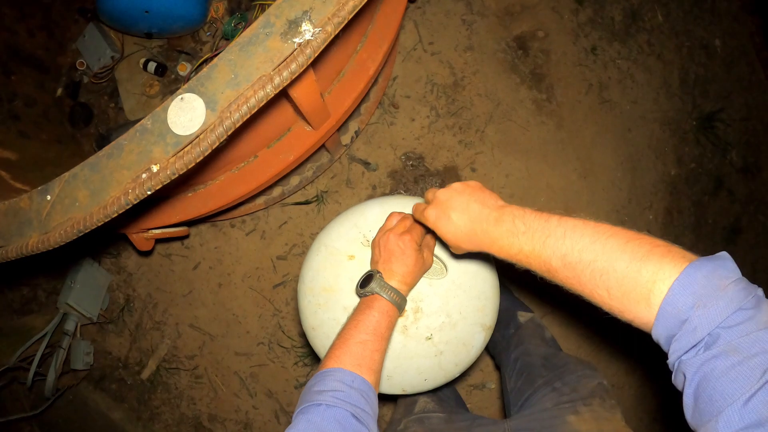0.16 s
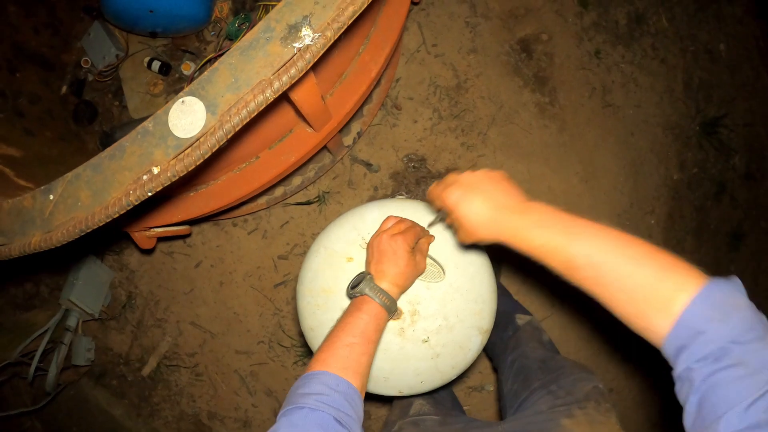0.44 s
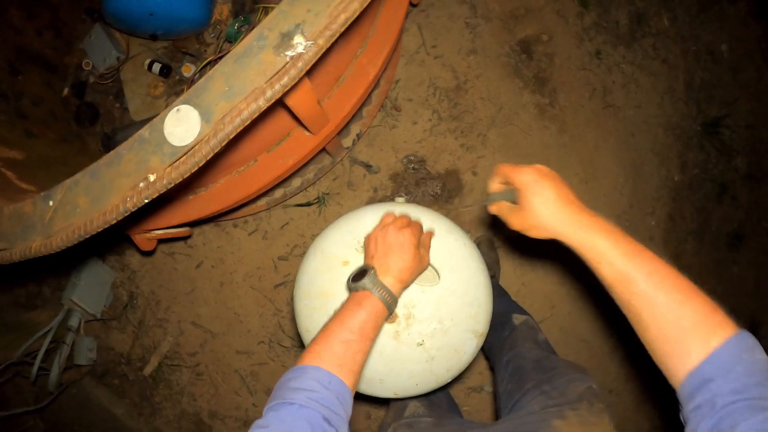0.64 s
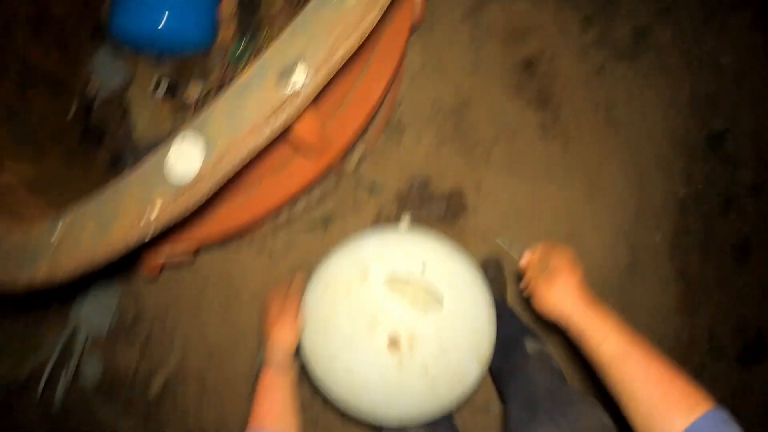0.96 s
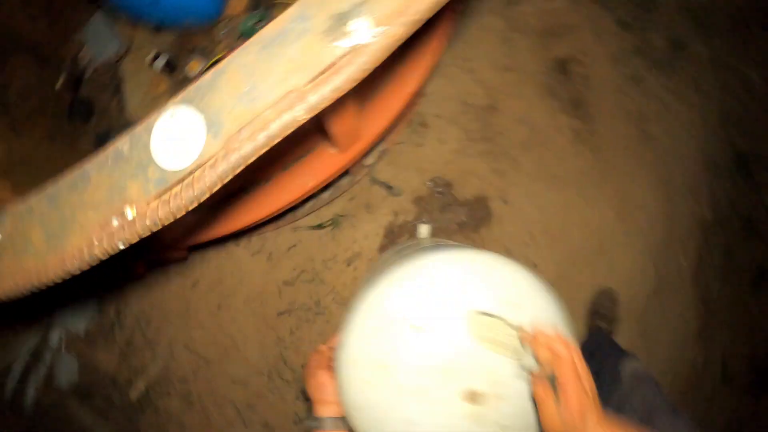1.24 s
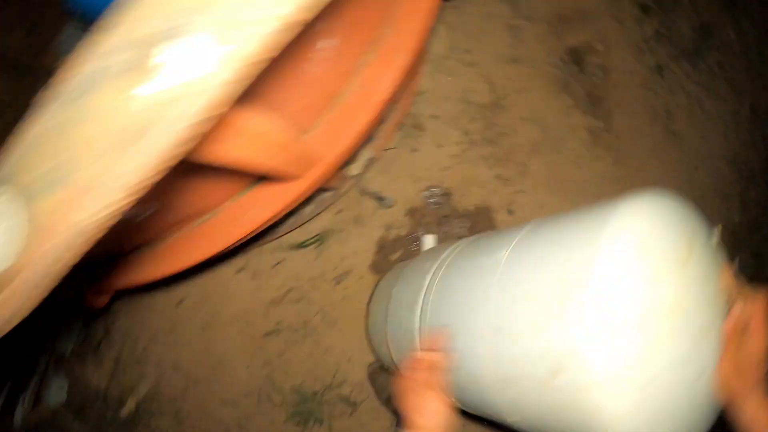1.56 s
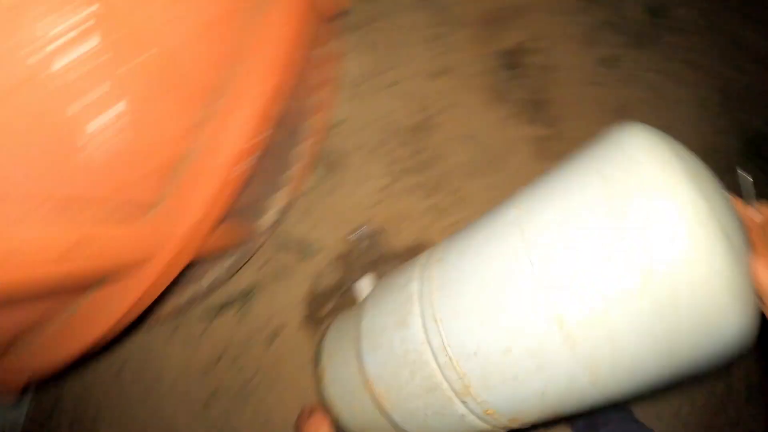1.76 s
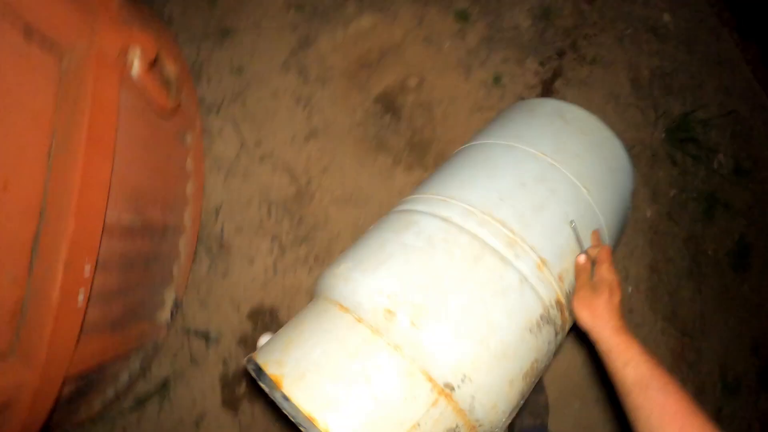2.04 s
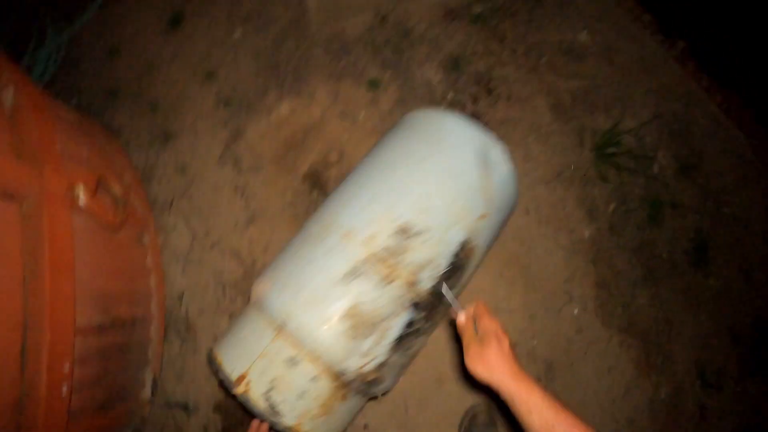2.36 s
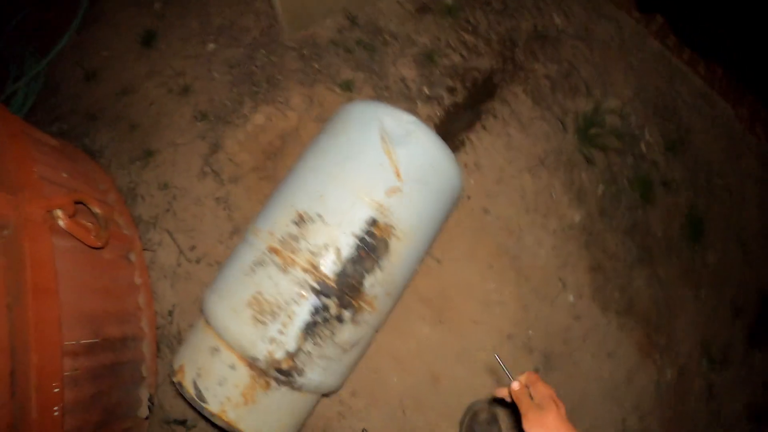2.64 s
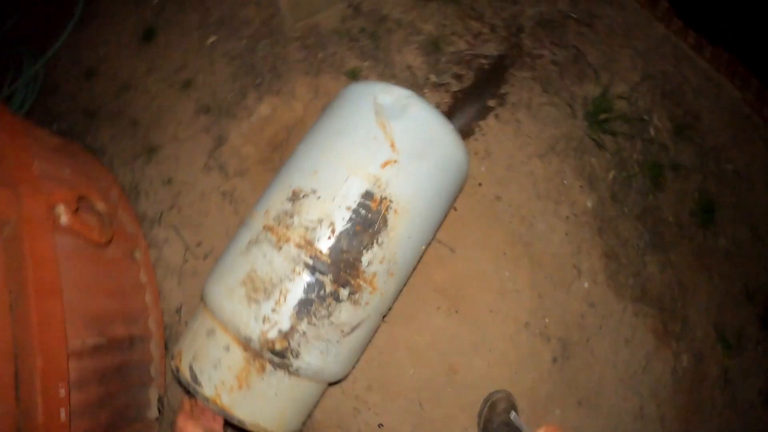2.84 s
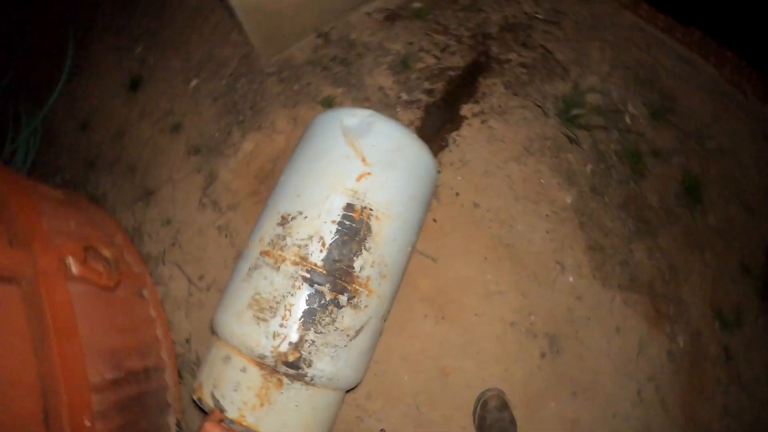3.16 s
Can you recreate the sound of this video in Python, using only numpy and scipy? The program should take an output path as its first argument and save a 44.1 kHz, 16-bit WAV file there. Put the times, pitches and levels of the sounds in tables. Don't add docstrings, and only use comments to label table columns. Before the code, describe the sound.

Air escaping a metal pressure tank bursts loudly, then the shell knocks, scrapes, sputters and drips.

```python
import sys
import numpy as np
from scipy import signal
from scipy.fft import rfft, irfft
from scipy.io import wavfile

SR = 44100
rng = np.random.default_rng(int(sys.argv[2]) if len(sys.argv) > 2 else 0)


def invert_db(level):
    return 10 ** (np.asarray(level, dtype=float) / 20)


def transcribe(signal):
    frames = np.atleast_2d(signal).T
    limited = np.clip(frames, -1, 1)
    pcm = np.round(limited * 32767).astype(np.int16)
    wavfile.write(sys.argv[1], SR, pcm)


N = 145530


def rms_one(x):
    return x / np.sqrt(np.mean(x ** 2) + 1e-20)


def in_time(rows, fade_s=0.0028):
    s, *columns = np.transpose(rows)
    t = np.arange(N) / SR
    opening = np.clip((t - s[0]) / fade_s + (s[0] < 1e-3), 0, 1)
    closing = np.clip((s[-1] - t) / fade_s + 1, 0, 1)
    return [np.interp(t, s, column) for column in columns] + [opening * closing]


def drift(rate_hz):
    r = np.exp(-80 * np.pi * rate_hz / SR)
    slow = signal.lfilter([1], [1, -2 * r, r * r], rng.standard_normal(N // 40 + 2002))[2000:]
    return np.interp(np.arange(N) / 40, np.arange(len(slow)), rms_one(slow))


def ring(x, hz, t60_s):
    r = invert_db(-60 / (t60_s * SR))
    w = 2 * np.pi * hz / SR
    return signal.lfilter([0, np.sin(w)], [1, -2 * r * np.cos(w), r * r], x + 1e-18)


def grains(per_s, spread_db):
    hits = rng.random(N) < per_s / SR
    size = invert_db(spread_db * np.minimum(rng.exponential(1, N), 4))
    return hits * size * rng.choice([-1, 1], N)


def turbulence(colour, patchy_db, rate_hz, grit=0.):
    hz = np.arange(N // 2 + 1) * SR / N + 1e-3
    f, db = np.transpose(colour)
    shape = invert_db(np.interp(np.log(hz), np.log(f), db, -90, -90))
    source = rng.standard_normal(N) + grit * rms_one(grains(3000, 4))
    full = rfft(source) * shape
    out, together = 0, drift(rate_hz)
    for centre in np.arange(np.floor(2 * np.log2(f[0])), 2 * np.log2(f[-1]) + 1):
        window = np.cos(np.pi / 2 * np.clip(2 * np.log2(hz) - centre, -1, 1)) ** 2
        band = irfft(full * window, N)
        out = out + band * invert_db(patchy_db * (.7 * together + drift(rate_hz)))
    return rms_one(out)


def wobble(width_hz):
    low_pass = signal.butter(2, width_hz, fs=SR, output="sos")
    return rms_one(signal.sosfilt(low_pass, rng.standard_normal(N)))


def leak():
    # t/s, level/dB, lower gap f/Hz, upper gap f/Hz, upper/dB, whistle/dB, palm/dB
    leak_curve = [(0, -28, 4500, 5380, 1, -13, -8), (.06, -30, 4600, 5280, -6, 0, -9),
                  (.11, -29, 4250, 5310, 2, -6, -8), (.165, -29, 4300, 5320, 5.5, -5, 2.5),
                  (.205, -30.5, 4300, 5400, -13, -20, 3.5), (.23, -25, 4700, 5420, 3.5, -20, -16),
                  (.28, -23, 4500, 5390, -4, -5, -21), (.306, -23, 4400, 5300, -2, 4, -25),
                  (.34, -25.5, 4500, 6700, 3.5, -12, -23), (.385, -23.5, 4250, 6410, 3, -8, -29),
                  (.43, -24.5, 4020, 6220, 4, -26, -16), (.465, -25, 3850, 6000, -5, -21, -12),
                  (.5, -20.5, 3800, 6050, -6, -19, -12), (.545, -23, 3700, 5900, -3, -12, -10)]
    # f/Hz, level/dB per Hz
    leak_colour = [(530, -65), (900, -11), (1330, 4.5), (1980, 2), (4280, 4.5), (6420, 0), (8550, -3.5),
                   (9630, -0.5), (15500, -26.5)]
    db, low_hz, up_hz, up_db, whistle_db, palm_db, gate = in_time(leak_curve)
    t = np.arange(N) / SR
    width_hz, opens_s = 620, .32
    lower = wobble(.5 * width_hz) * np.sin(np.cumsum(low_hz) / SR * 2 * np.pi)
    up_wobble = np.where(t < opens_s, wobble(.4 * width_hz), wobble(width_hz))
    upper = invert_db(up_db) * up_wobble * np.sin(np.cumsum(up_hz) / SR * 2 * np.pi)
    whistle = invert_db(whistle_db) * wobble(width_hz) * np.sin(2 * np.pi * 9800 * t)
    palm = invert_db(palm_db) * wobble(.2 * width_hz) * np.sin(2 * np.pi * 1340 * t)
    hiss = turbulence(leak_colour, 1.2, 20)
    return gate * invert_db(db - 2.5) * (hiss + invert_db(-1) * (lower + upper + whistle + palm))


def jet():
    # t/s, level/dB, share turned away/0-1
    jet_curve = [(.535, -65, 0.08), (.555, -18.5, 0), (.577, -11.5, 0), (.598, -19, 0.04), (.68, -15, 0),
                 (.75, -22.5, 0.2), (.79, -14.5, 0.08), (1.28, -16.5, 0.02), (1.375, -25, 0.6),
                 (1.72, -26, 0.6), (1.81, -29.5, 0.95), (1.84, -54, .9)]
    # t/s, level/dB
    beat_curve = [(.54, -26.5), (.575, -24.5), (.6, -18), (.63, -16), (.66, -20), (.7, -14), (.73, -13.5),
                  (.75, -18), (.8, -28)]
    # f/Hz, level/dB per Hz
    jet_colour = [(180, -43), (300, -19.5), (397, -19.5), (1220, -15.5), (1870, -6), (4420, 1), (8560, -6),
                  (9600, -1.5), (15500, -34.5)]
    away_colour = [(180, -56), (300, -32), (620, -14.5), (1460, -9), (2600, -3), (4800, -3.5), (9450, -4),
                   (15500, -26.5)]
    beat_colour = [(180, -41), (300, -9), (522, -14.5), (1200, -2), (2400, 3), (3430, -5.5), (4500, -1),
                   (7000, -15), (11000, -31)]
    db, away, gate = in_time(jet_curve)
    away = np.clip(away, 0, 1)
    beat_db, beat_gate = in_time(beat_curve)
    facing = np.sqrt(1 - away) * turbulence(jet_colour, .6, 25)
    turned = np.sqrt(away) * turbulence(away_colour, .6, 25)
    roar = turbulence(beat_colour, patchy_db=1.35, rate_hz=15, grit=0.71)
    return gate * invert_db(db + 1.5) * (facing + turned) + beat_gate * invert_db(beat_db + 2.0) * roar


def thuds(grit):
    # t/s, length/s, peak level/dB, strongest f/Hz
    contacts = [(1.792, 0.017, -27.5, 706), (1.833, 0.031, -17, 204), (1.861, 0.057, -21, 296),
                (1.862, 0.084, -20.5, 666), (1.924, 0.024, -29, 700), (1.982, 0.18, -20.5, 610),
                (2.06, 0.0091, -23.5, 274), (2.159, 0.022, -21, 970), (2.341, 0.05, -26.5, 400),
                (2.445, 0.034, -24, 296), (2.477, 0.076, -29.5, 700), (2.524, 0.021, -25.5, 543),
                (2.704, 0.03, -23.5, 505), (2.769, 0.022, -16, 415), (2.786, 0.031, -18, 800),
                (3, 0.027, -36, 500)]
    # f/Hz, t60/s
    shell = [(130, 0.032), (188, 0.02), (312, 0.017), (430, 0.043), (622, 0.057), (775, 0.032),
             (890, 0.077), (1065, 0.04), (1400, 0.05), (2035, 0.029), (2450, 0.037)]
    rise, spread_oct = .1, 0.89
    out = np.zeros(N)
    for s, length, db, hz in contacts:
        i = int(s * SR)
        x = np.arange(SR // 12) / SR / length
        push = grit[i:i + len(x)] * np.clip(np.minimum(x / rise, (1 - x) / (1 - rise)), 0, 1)
        body = 0
        for k, (f, t60) in enumerate(shell):
            nearness = np.exp(-(np.log2(f / hz) / spread_oct) ** 2)
            body = body + nearness * (-1) ** k * ring(push, f, t60)
        out[i:i + len(x)] += invert_db(db) * body / np.abs(body).max() * np.cos(np.pi / 2 * x / x[-1])
    return out


def scrapes(grit):
    # t/s, length/s, level/dB, top f/Hz
    strokes = [(1.794, 0.074, -28, 4530), (1.859, 0.052, -24.5, 4430), (1.857, 0.021, -24.5, 3460),
               (1.902, 0.1, -31.5, 5100), (1.93, 0.024, -36, 8000), (1.992, 0.07, -34, 4800),
               (1.997, .045, -32, 8000), (2.052, .03, -40, 4600), (2.131, 0.17, -28, 5400),
               (2.17, .09, -47, 6960), (2.335, 0.033, -31.5, 6800), (2.401, 0.028, -35, 4600),
               (2.425, 0.053, -40, 4500), (2.463, 0.031, -29, 4770), (2.526, 0.038, -32, 5140),
               (2.55, .04, -38, 5030), (2.58, 0.045, -38.5, 3520), (2.628, .03, -28.5, 5460)]
    low_hz, edge = 700, 0.41
    out, t = np.zeros(N), np.arange(N) / SR
    jerks = drift(60)
    skin_hz = np.linspace(1000, 6500, 40) + rng.uniform(-60, 60, 40)
    skin = sum(ring(grit, hz, .03) for hz in skin_hz)
    grind = rms_one(grit) + 0.32 * rms_one(skin)
    for s, length, db, hz in strokes:
        x = np.clip((t - s) / length, 0, 1)
        stroke = np.clip(np.minimum(2 * x, 1 - x) / edge, 0, 1)
        band = signal.butter(3, [low_hz, min(hz, 15000)], "band", fs=SR, output="sos")
        out += invert_db(db + 2 * jerks) * stroke * rms_one(signal.sosfilt(band, grind))
    return out


def tank():
    grit = rng.standard_normal(N) + 1.34 * rms_one(grains(2000, 1.6))
    return thuds(grit) + scrapes(grit)


def knocks():
    # t/s, peak level/dB, f/Hz, t60/s
    hollow = [(1.837, -20, 199, 0.046), (1.847, -20, 188, .06), (1.866, -22.5, 303, 0.16),
              (1.868, -17, 613, 0.062), (1.88, -18, 764, 0.073), (2.067, -34, 1074, 0.13),
              (2.09, -36, 1052, .07), (1.867, -20.5, 187, 0.092), (2.354, -27.5, 252, 0.13),
              (2.358, -23, 138, 0.054), (2.432, -21.5, 324, 0.052), (2.45, -27, 336, 0.1),
              (2.477, -18, 199, 0.05), (2.486, -18, 364, 0.04)]
    out, t = np.zeros(N), np.arange(SR // 4) / SR
    rise_s = .003
    for s, db, hz, t60 in hollow:
        i = int(s * SR)
        swell = 1 - np.exp(-t / rise_s)
        out[i:i + len(t)] += 2 * invert_db(db - 60 * t / t60) * swell * np.sin(2 * np.pi * hz * t)
    return out * invert_db(2 * drift(90))


def ticks():
    # t/s, peak level/dB, t60/s
    cracks = [
        (1.867, -27, 0.021),
        (1.896, -32, 0.015),
        (1.9315, -41, 0.013),
        (1.94, -41, 0.0097),
        (2.1535, -44, 0.016),
        (2.345, -38, 0.017),
        (2.411, -36, 0.011),
        (2.4675, -32, 0.021),
        (2.5345, -36, 0.013),
    ]
    out, t = np.zeros(N), np.arange(SR // 4) / SR
    band = signal.butter(3, [2000, 10500], "band", fs=SR, output="sos")
    crack = rms_one(signal.sosfilt(band, rng.standard_normal(N)))
    for s, db, t60 in cracks:
        i = int(s * SR)
        out[i:i + len(t)] += invert_db(db - 60 * t / t60) * crack[i:i + len(t)]
    return out


def spray():
    # t/s, level/dB, low splatter over hiss/dB
    spray_curve = [(2.675, -57, 9), (2.7, -29.5, 11.5), (2.745, -24, 0.5), (2.82, -26, 9.5),
                   (2.845, -24.5, 1.5), (2.885, -20.5, -4), (3.0, -18.5, -8), (3.035, -23, 8.5),
                   (3.066, -44, 13.5)]
    # f/Hz, level/dB per Hz
    spray_colour = [(350, -32), (600, -7), (1430, -17.5), (1780, -6), (2720, -1.5), (3470, -5.5),
                    (4810, -2.5), (9890, -5.5), (15500, -32)]
    splatter_colour = [(180, -20), (300, -7.5), (785, -11), (1260, -9), (1380, -9.5), (1540, -8),
                       (2670, -1.5), (7000, -11), (9100, -64), (15400, -120)]
    db, low_db, gate = in_time(spray_curve)
    hiss = turbulence(spray_colour, patchy_db=1, rate_hz=25, grit=0.18)
    splatter = turbulence(splatter_colour, patchy_db=2.0, rate_hz=12, grit=0.86)
    return gate * invert_db(db - 3.0) * (hiss + invert_db(low_db) * splatter)


def trickle():
    # t/s, level/dB
    trickle_curve = [(1.82, -38), (1.95, -30.5), (2.1, -34), (2.3, -37.5), (2.45, -34), (2.6, -31),
                     (2.68, -34.5), (3.04, -33), (3.15, -30.5), (3.3, -32.5)]
    # f/Hz, level/dB per Hz
    trickle_colour = [(410, -2.5), (700, -15), (1670, -11.5), (1780, -12), (1920, -9.5), (3030, -5.5),
                      (3400, -8), (6500, -17), (9850, -18.5), (15500, -48)]
    db, gate = in_time(trickle_curve)
    born = grains(500 * invert_db(4.1 * drift(7.1)), 4.9)
    dealt = rng.integers(0, 16, N)
    bubbles = 0
    for k, hz in enumerate(np.geomspace(1900, 4300, num=16)):
        bubbles = bubbles + ring(born * (dealt == k), hz, 2 * 20 / hz)
    patter = turbulence(trickle_colour, patchy_db=2.0, rate_hz=15, grit=0.58)
    return gate * invert_db(db) * (patter + invert_db(-9) * rms_one(bubbles))


def drips():
    # t/s, peak level/dB, f/Hz
    drops = [
        (2.4705, -25, 3800),
        (2.641, -25, 2850),
        (3.1363, -33, 2720),
        (3.15, -28, 2660),
        (3.1872, -27, 2970),
        (3.2319, -31, 4320),
        (3.2595, -17, 2970),
    ]
    decay_cycles, rise = 50, .06
    out, t = np.zeros(N), np.arange(N) / SR
    rough = .2 * drift(300)
    for s, peak_db, hz in drops:
        cycles = np.maximum(t - s, 0) * hz
        swell = 1 - np.exp(-cycles)
        tone = np.sin(2 * np.pi * cycles * (1 + rise * cycles / decay_cycles))
        out += invert_db(peak_db - 60 * cycles / decay_cycles) * swell * 2 * (1 + rough) * tone
    return out


def rumble():
    # t/s, level/dB
    rumble_curve = [(0, -33.5), (.35, -32), (.58, -37), (.8, -41.5), (1.4, -46), (1.9, -39.5),
                    (2.55, -38.5), (2.65, -37), (3.3, -35.5)]
    # f/Hz, level/dB per Hz
    rumble_colour = [(15, -54), (25, -9.5), (136, -7), (178, -5.5), (248, -10), (468, -8.5), (717, -19.5),
                     (789, -20.5), (1100, -39), (1430, -56), (2420, -120)]
    # f/Hz, width/Hz, level/dB
    machine_hums = [
        (113, 12, -3),
        (185, 30, 5),
    ]
    db, _ = in_time(rumble_curve)
    hums = 0
    for hz, width_hz, hum_db in machine_hums:
        hums = hums + invert_db(hum_db) * rms_one(ring(rng.standard_normal(N), hz, 1.47 / width_hz))
    noise = turbulence(rumble_colour, patchy_db=0.5, rate_hz=41)
    return invert_db(db - 3.5) * (noise + invert_db(-2.5) * hums)


def scene():
    # delay t/s, level/dB
    echoes = [
        (.0031, -32),
        (.0074, -20),
    ]
    near = leak() + jet() + tank() + knocks() + ticks() + spray() + trickle() + drips()
    for s, db in echoes:
        near = near + invert_db(db) * np.concatenate([np.zeros(int(s * SR)), near])[:N]
    return np.tile(near * invert_db(-1.04) + rumble(), (2, 1))


def band_limit(x):
    return signal.sosfilt(signal.butter(12, 15940, fs=SR, output="sos"), x)


def record(dry):
    # t/s, length/s
    side_spells = [
        (.09, .16),
        (.54, .1),
        (.95, .1),
        (1.15, .09),
        (1.9, .1),
        (2.87, .06),
    ]
    notch_hz, notch_width_hz, notch_depth = 8600, 650, .58
    b, a = signal.iirpeak(notch_hz, notch_hz / notch_width_hz, fs=SR)
    mid = dry[0] - notch_depth * signal.lfilter(b, a, dry[0])
    mid = signal.sosfilt(signal.butter(2, 61, "high", fs=SR, output="sos"), mid)
    mid = np.tanh(mid)
    phase = np.cumsum(rng.normal(0, .1, N))
    other = np.real(signal.hilbert(mid) * np.exp(1j * phase))
    t = np.arange(N) / SR
    spells = sum((t > s) & (t < s + length) for s, length in side_spells)
    steep = signal.cheby2(12, 60, 10700, "high", fs=SR, output="sos")
    top = signal.sosfilt(steep, invert_db(-0.5) * other + 0.35 * mid)
    side = invert_db(-24) * spells * other + top
    return band_limit(np.array([mid + side, mid - side]))


dry = scene()
out = record(dry)
transcribe(out)
```